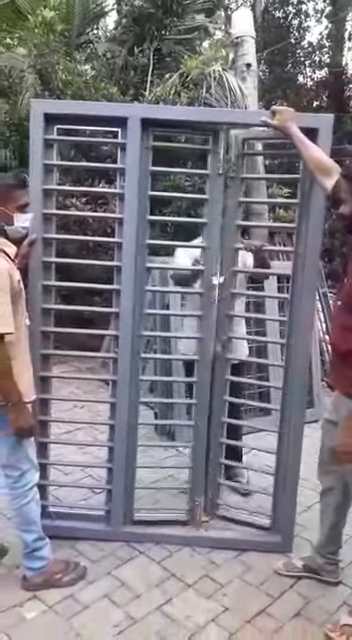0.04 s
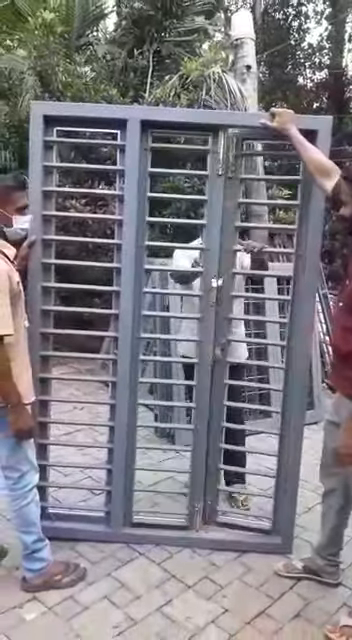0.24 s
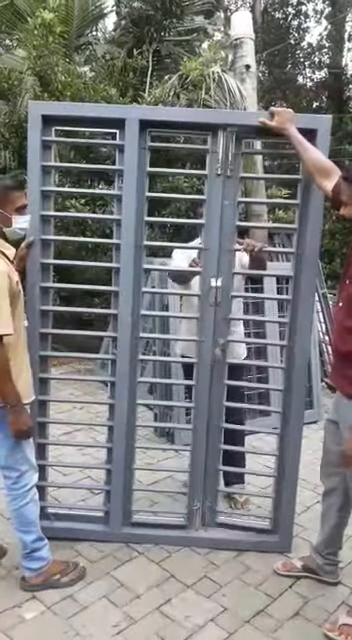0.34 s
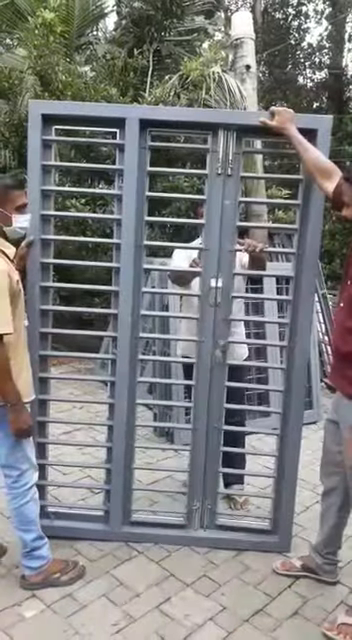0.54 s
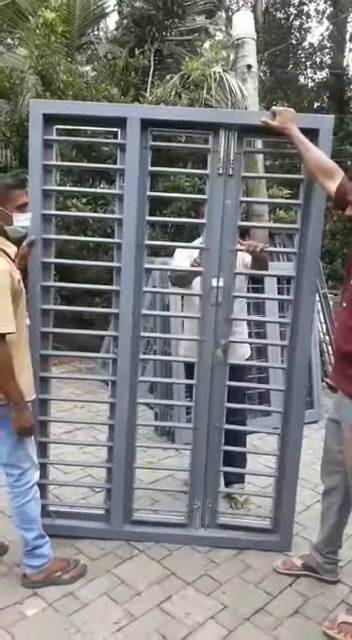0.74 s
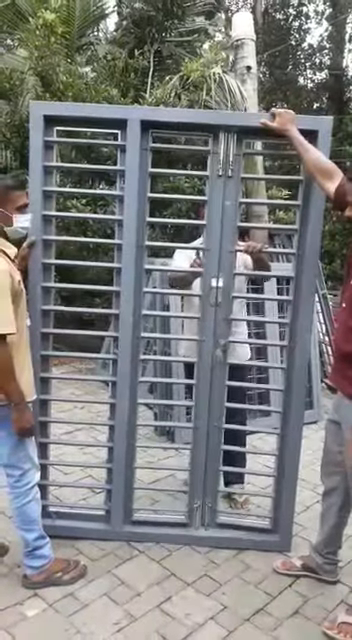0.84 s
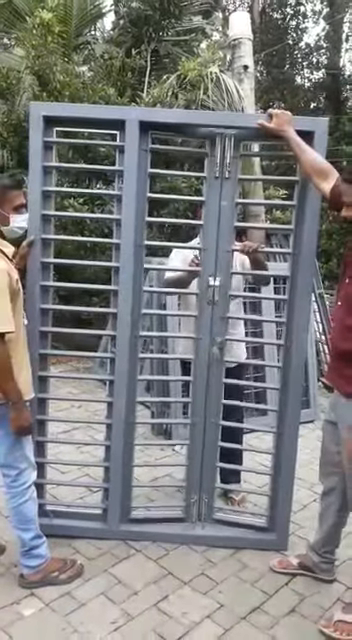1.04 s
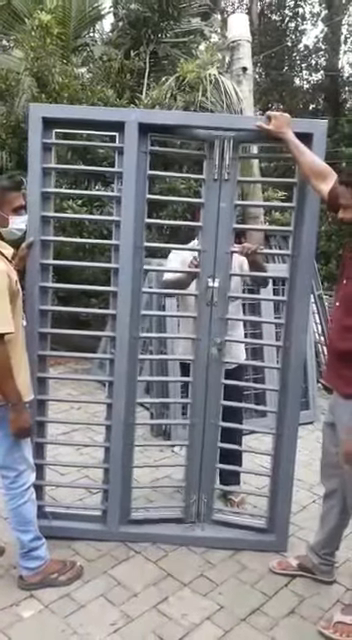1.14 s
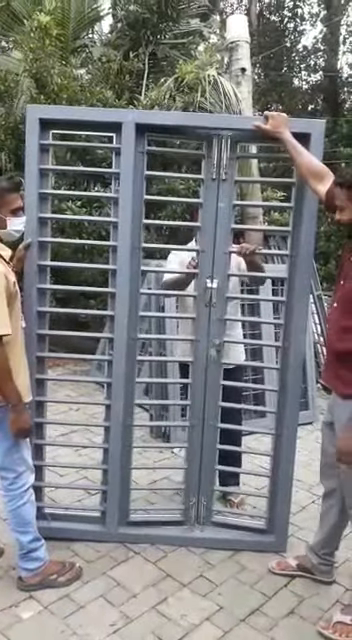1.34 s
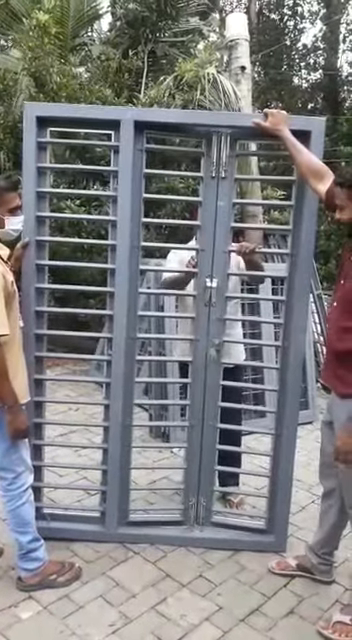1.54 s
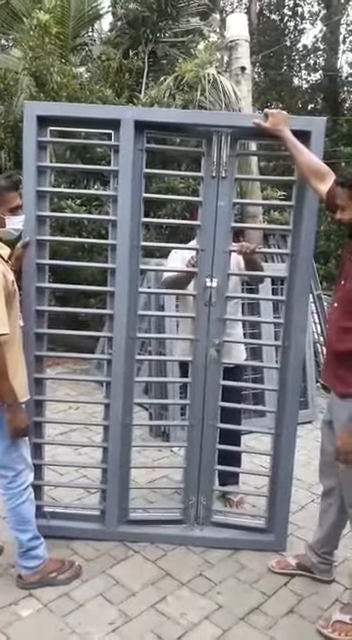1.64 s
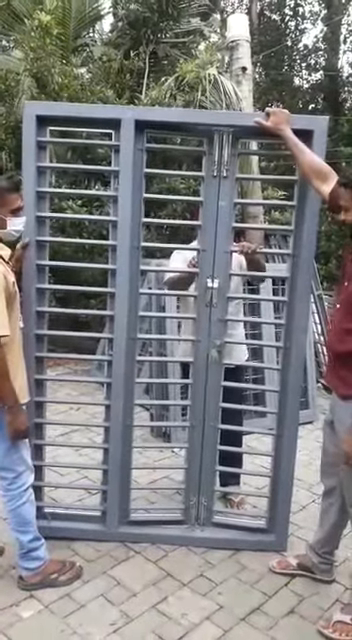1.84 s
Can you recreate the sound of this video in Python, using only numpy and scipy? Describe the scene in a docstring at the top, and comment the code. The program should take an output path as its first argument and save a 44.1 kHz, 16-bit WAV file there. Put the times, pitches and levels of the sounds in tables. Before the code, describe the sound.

Two barred steel shutter leaves slam against their metal frame with two loud clanks in quick succession, then small taps and a lighter late clack, over thin cicada buzz and cricket chirps in an open yard, phone microphone nearby.

```python
"""Two steel shutter leaves swing shut against their barred frame in a paved yard. Each contact excites a dense
decaying ring and clear bar modes; low hums, light taps and bright latch jingles accompany the contacts.
Cicadas are noise gated by uneven clicks and heard through resonances; a cricket is a pulsed, wavering whistle.
One soft rustle of leaves and the yard air are coloured noise."""
import sys
import numpy as np
from scipy import signal
from scipy.fft import rfft, irfft, next_fast_len
from scipy.io import wavfile
from scipy.ndimage import uniform_filter1d, map_coordinates

SR = 44100
rng = np.random.default_rng(int(sys.argv[2]) if len(sys.argv) > 2 else 0)


def store_wav(level_fs):
    """Save 16-bit WAV to argv[1]."""
    pcm = np.round(np.clip(np.atleast_2d(level_fs), -1, 1) * 32767)
    wavfile.write(sys.argv[1], SR, pcm.T.astype(np.int16))


def undo_db(level):
    """Turn decibels back into plain size, where 20 dB means ten times bigger."""
    steps = np.asarray(level, float) / 20
    return 10 ** steps


N = 83790  # length of the scene in samples

# Contacts of leaf on frame: start_s, level_db, treble_lift_db, bass_lift_db, ring_share (factor on decay times)
CONTACTS = [(-.02, -38.5, -0.5, -9.5, 1.1), (0.2367, -14, -5, 3.5, 0.61), (.241, -17, -8, 3, 0.76),
            (.246, -13, -4, 0, 0.92), (0.256, -37, 14.5, -16, 1.5), (.308, -27, 1.5, -5, 1.73),
            (.338, -29.5, 0.5, -4, 0.7), (.362, -30.5, 7, -23, 0.43), (.507, -18, 8, 3.5, 1.18),
            (.5105, -24, 5.5, -5.5, 1.6), (.518, -12.5, -5, 2.5, 0.53), (.533, -15, 0.5, 4, 0.74),
            (0.579, -31.5, 10.5, 10, 2.17), (.616, -27, 6, -33, 0.38), (.648, -25.5, 4, -3, 1.01),
            (.715, -36, 3.5, -17, 1.3), (0.816, -37.5, -1.5, 6, 0.76), (0.859, -44.5, -6.5, 9, 1.04),
            (1.284, -46.5, -4, 11.5, 2.4), (1.372, -39.5, -3, 1, 1.25), (1.568, -39.5, 1.5, 8, 0.63),
            (1.582, -23.5, 3, -12.5, 0.48), (1.59, -29, 0, 5, 0.96), (1.621, -27, 1, -6, 0.76),
            (1.645, -45, 6, 18, 1.18), (1.677, -36.5, -1, -10, 0.9), (1.738, -40.5, 1, -13, 1.87)]
TREBLE_LIFT_HZ, BASS_LIFT_HZ = 3020, 626  # half of each lift in dB is reached here
# Clear modes of the bars: pitch_hz, level_db (before lift and scatter), t60_s (before ring_share)
BAR_MODES = [(609.1, -12, 0.34), (649, -14.5, 0.29), (1009, -12.5, 0.28), (1087, -16, 0.41),
             (1145, -18, 0.42), (1438, -15, 0.28), (1596, -29, 0.98), (1836, -3.5, 0.17), (1890, -15, 0.46),
             (2020, -16, 0.34), (2020, -31, 0.17), (2200, -33, 0.26), (2116, -44, 0.12),
             (2595, -24.5, 0.91), (2860, -16, 0.3), (2930, -26, 0.21), (3690, -44, 0.31)]
MODE_SCATTER_DB, MODE_RISE_S = 3, 0.0012
# Dense ring of bars and sheet, relative spectrum: frequency_hz, density_db (per Hz)
RING_SPECTRUM = [(80, -24), (170, -14), (300, -2.5), (470, -7), (620, -4), (1000, -3.5), (1400, -2.5),
                 (2250, 3), (3200, -4), (4500, -12), (6500, -17.5), (8700, -18.5), (10300, -35),
                 (12500, -29), (15700, -41)]
# Decay of the dense ring: frequency_hz, t60_s (before ring_share)
RING_DECAY = [(200, 0.59), (600, 0.31), (2000, 0.29), (5000, 0.22), (9000, 0.21), (14000, 0.27)]
RING_DB, RISE_S = 2.5, 0.0012
STRIKE_DB, STRIKE_T60_FACTOR = -7.5, 0.13  # short start of the ring, added to the main part
LINGER_DB, LINGER_T60_FACTOR = -20.5, 3.1  # weaker, longer part of the ring
CHATTER_DB, CHATTER_KNOTS_PER_S = 1.2, 140  # fast unevenness of the loose leaves
STEEL_CUT_HZ = 122

# Low hums of the whole frame after a blow: start_s, level_db, t60_s (before the choke)
HUMS = [(0.239, -20.5, 0.49), (.512, -19, 1.1), (.645, -34, 0.37), (1.599, -37.5, 0.88)]
# Modes of the hum: pitch_hz, level_db
HUM_MODES = [(183, -20), (240, -15.5), (279, -3), (309, -1.5), (345, -16)]
HUM_RISE_S, HUM_WAVER_RAD = 0.0058, 0.8
HUM_CHOKE_S = 0.22  # the held frame chokes its hum after about this long

# Light taps of single bars and fittings: start_s, level_db, centre_hz, half_width_octaves, t60_s
TAPS = [(0.729, -25.5, 2530, 0.22, 0.078), (0.815, -28.5, 1890, 0.38, 0.063),
        (.819, -35, 660.5, 0.45, 0.17), (0.984, -33, 2410, 0.37, 0.074), (.987, -51.5, 3700, 0.019, 0.24),
        (1.286, -41.5, 802, 1, 0.25), (1.289, -41, 330, 0.11, 0.54), (1.3, -39.5, 202, 0.15, 0.57),
        (1.373, -36.5, 315, .3, 0.31), (1.528, -40, 650, 0.42, 0.16), (1.534, -45.5, 1040, 0.14, 0.25),
        (1.585, -34.5, 1127, 0.11, 0.19), (1.716, -25.5, 2315, 0.36, 0.12),
        (1.877, -34.5, 2315, 0.34, 0.13)]
# Bright jingles of the latch: start_s, level_db, t60_s
JINGLES = [(0.244, -30, 0.094), (.252, -23, 0.084), (0.269, -41, .3), (.336, -38, .12), (.356, -34.5, 0.14),
           (.364, -43, 0.12), (0.51, -26, .15), (0.529, -32, 0.23), (.58, -50, 0.23), (.648, -48, 0.093),
           (.798, -52, 0.069), (.817, -53, .1), (1.371, -57, .1), (1.57, -52, 0.11), (1.587, -42, .06),
           (1.617, -38, .07), (1.64, -52, .1), (1.674, -47, .1), (1.736, -52, .08)]
# Latch and loose fittings, relative spectrum: frequency_hz, density_db (per Hz)
JINGLE_SPECTRUM = [(5000, -39), (7000, -49), (10500, -5.5), (13000, 4.5), (14500, 3), (15700, -1)]
JINGLE_RISE_S = 0.0015

# Course of the cicada buzz: time_s, level_db
CICADA_COURSE = [(0.0, -36.5), (0.348, -36.5), (0.942, -40.5), (1.238, -40.5), (1.804, -36.5), (1.9, -35.5)]
# Resonances of the cicada buzz: centre_hz, width_hz, level_db, gust_db (its sign sets the direction)
BUZZ_BANDS = [(2276, 190, -7.5, 2), (4495, 400, -20.5, -1.5), (8510, 260, -11, -2), (8988, 474, -3.5, 1.5),
              (13300, 500, -33, -4)]
CLICK_RATE_HZ, CLICK_JITTER, CLICK_FLOOR = 300, 0.66, 1  # mean rate, relative jitter, noise between clicks

# Cricket chirps: centre_s, level_db
CHIRPS = [(.2, -35.5), (.53, -30), (.862, -34.5), (1.2, -38), (1.53, -54), (1.87, -36)]
CHIRP_HZ, CHIRP_HALF_WIDTH_S, CHIRP_PULSE_HZ, CHIRP_PULSE_DEPTH = 8660, 0.026, 265, 0.13

# Leaf rustle, relative spectrum: frequency_hz, density_db (per Hz)
RUSTLE_SPECTRUM = [(1200, -11), (1700, 3.5), (3000, 0), (6000, -9.5), (10000, -17), (13000, -13.5),
                   (15700, -18)]
RUSTLE_PEAK_S, RUSTLE_SIGMA_S, RUSTLE_DB, RUSTLE_FLICKER_DB = 1.203, 0.096, -44.5, 1.0
# Yard air, relative spectrum: frequency_hz, density_db (per Hz)
AIR_SPECTRUM = [(25, -28), (80, -3.5), (250, -3), (550, -12.5), (1100, -18), (2250, -9), (3400, -16.5),
                (4400, -20), (7400, -18), (8900, -17), (10200, -34), (15700, -26)]
AIR_DB, AIR_SWAY_DB = -51.5, 1.2


def unit(x):
    """Normalisation: scale a signal to rms 1."""
    return x / np.sqrt(np.mean(x ** 2) + 1e-20)


def along(points, hz):
    """Interpolation of (frequency, value) points on a logarithmic frequency axis."""
    f, v = np.transpose(points)
    return np.interp(np.log(hz + 1), np.log(f + 1), v)


def wobble(rate):
    """Smooth random modulation, slow or fast: a cubic spline through random knots, rate knots a second."""
    knots = rng.standard_normal(int(N * rate / SR) + 4)
    return map_coordinates(knots, [np.arange(N) * rate / SR])


def filtered(x, response):
    """Linear filtering: multiply the spectrum by a response of frequency."""
    m = next_fast_len(N + SR // 2)
    return irfft(rfft(x, m) * response(np.fft.rfftfreq(m, 1 / SR)), m)[:N]


def hiss(spectrum, patchy_db):
    """Random texture: coloured noise of rms 1 with time-frequency patches of random gain."""
    z = signal.stft(rng.standard_normal(N), nperseg=512)[2]
    field = uniform_filter1d(rng.standard_normal(z.shape), 6, 0)
    field = uniform_filter1d(field, 10, 1)
    patchy = signal.istft(z * undo_db(patchy_db * unit(field)), nperseg=512)[1][:N]
    return unit(filtered(patchy, lambda hz: undo_db(along(spectrum, hz))))


def shutters():
    """Superposition of all contacts, hums, taps and jingles; the frame radiates no deep bass."""
    sounds = [(s, undo_db(db) * clang(*how)) for s, db, *how in CONTACTS]
    sounds += [(s, undo_db(db) * hum(t60)) for s, db, t60 in HUMS]
    sounds += [(s, undo_db(db) * tap(*how)) for s, db, *how in TAPS]
    sounds += [(s, undo_db(db) * jingle(t60)) for s, db, t60 in JINGLES]
    out = np.zeros(N + 2 * SR)  # one second of margin at each end
    for s, one in sounds:
        out[round((s + 1) * SR):][:len(one)] += one

    def radiation(hz):
        ratio = 1j * hz / STEEL_CUT_HZ
        return (ratio / (1 + ratio)) ** 3
    return filtered(out[SR:SR + N], radiation)


def clang(treble_db, bass_db, share):
    """Impact excitation: a dense ring dying band by band, plus the clear modes of the bars."""
    t = np.arange(SR * 3 // 4) / SR

    def lift_db(hz):
        bass = bass_db / (1 + (hz / BASS_LIFT_HZ) ** 4)
        return bass + treble_db / (1 + (TREBLE_LIFT_HZ / (hz + 1)) ** 4)

    hz, s, z = signal.stft(rng.standard_normal(len(t)), SR, nperseg=512, noverlap=384)
    t60 = share * along(RING_DECAY, hz)[:, None]
    fade = undo_db(-60 * s / t60)
    fade = fade + undo_db(STRIKE_DB - 60 * s / (t60 * STRIKE_T60_FACTOR))
    fade = fade + undo_db(LINGER_DB - 60 * s / (t60 * LINGER_T60_FACTOR))
    colour = undo_db(along(RING_SPECTRUM, hz))
    gain = colour * undo_db(lift_db(hz)) / np.sqrt(np.mean(colour ** 2))
    z *= gain[:, None] * fade
    dense = signal.istft(z, SR, nperseg=512, noverlap=384)[1][:len(t)]
    dense = dense * (1 - np.exp(-t / RISE_S))
    chatter = undo_db(RING_DB + CHATTER_DB * wobble(CHATTER_KNOTS_PER_S)[:len(t)])

    f, db, ring_s = np.transpose(BAR_MODES)[:, :, None]
    scatter, turns = rng.standard_normal((2, len(f), 1))  # random level and phase of each mode
    mode_level = undo_db(db + lift_db(f) + MODE_SCATTER_DB * scatter - 60 * t / (ring_s * share))
    clear = (mode_level * np.sin(2 * np.pi * (f * t + turns))).sum(0)
    return chatter * dense + clear * (1 - np.exp(-t / MODE_RISE_S))


def hum(t60):
    """Modal superposition: low modes of the frame beat, waver a little and are choked."""
    t = np.arange(SR) / SR
    ring = np.zeros(SR)
    for hz, db in HUM_MODES:
        waver = HUM_WAVER_RAD * wobble(14.2)[:SR]
        ring += undo_db(db) * np.sin(2 * np.pi * hz * t + waver)
    choke = 1 / (1 + (t / HUM_CHOKE_S) ** 6)
    return ring * undo_db(-60 * t / t60) * choke * (1 - np.exp(-t / HUM_RISE_S))


def tap(centre_hz, octaves, t60):
    """Resonance of a lightly struck bar or fitting: a noise burst in one band."""
    return burst(lambda f: 1 / (1 + (np.log2(f / centre_hz) / octaves) ** 4), t60, RISE_S)


def jingle(t60):
    """Vibration of the latch and loose fittings: a bright noise burst."""
    return burst(lambda f: undo_db(along(JINGLE_SPECTRUM, f)), t60, JINGLE_RISE_S)


def burst(colour, t60, rise_s):
    """Exponential decay: coloured noise, rms 1 before its envelope, rises fast and dies away."""
    t = np.arange(SR // 2) / SR
    hz = np.fft.rfftfreq(len(t), 1 / SR) + 1
    noise = irfft(rfft(rng.standard_normal(len(t))) * colour(hz), len(t))
    chatter_db = CHATTER_DB * wobble(CHATTER_KNOTS_PER_S)[:len(t)]
    return unit(noise) * undo_db(chatter_db - 60 * t / t60) * (1 - np.exp(-t / rise_s))


def cicadas():
    """Resonant filtering of uneven tymbal clicks, blurred by the chorus."""
    level_db = np.interp(np.arange(N) / SR, *np.transpose(CICADA_COURSE))
    out = np.zeros(N)
    for hz, width_hz, db, gust_db in BUZZ_BANDS:
        phase = np.cumsum(CLICK_RATE_HZ * (1 + CLICK_JITTER * wobble(65))) / SR
        gate = CLICK_FLOOR + (0.5 + 0.5 * np.cos(2 * np.pi * phase)) ** 4
        band = filtered(gate * rng.standard_normal(N),
                        lambda f: 1 / (1 + (2 * (f - hz) / width_hz) ** 4) ** 0.5)
        gust = np.tanh(wobble(11.3) + 0.35 * wobble(40.86))
        out += undo_db(db + gust_db * gust) * unit(band)
    return undo_db(level_db) * out


def cricket():
    """Amplitude modulation: short pulsing whistles, three a second, with a wavering phase."""
    t = np.arange(N) / SR
    shape = sum(undo_db(db) * np.exp(-((t - s) / CHIRP_HALF_WIDTH_S) ** 4) for s, db in CHIRPS)
    shape *= 1 + CHIRP_PULSE_DEPTH * np.cos(2 * np.pi * CHIRP_PULSE_HZ * t)
    return shape * np.sin(2 * np.pi * CHIRP_HZ * t + 0.61 * wobble(27.4))


def rustle():
    """Broadband noise of leaves under one Gaussian swell with a slight flicker."""
    t = np.arange(N) / SR
    swell = np.exp(-0.5 * ((t - RUSTLE_PEAK_S) / RUSTLE_SIGMA_S) ** 2)
    level = undo_db(RUSTLE_DB + RUSTLE_FLICKER_DB * wobble(29.96))
    return level * swell * hiss(RUSTLE_SPECTRUM, patchy_db=2.2)


def yard_air():
    """Ambient noise: outdoor air as coloured noise whose level sways gently."""
    return undo_db(AIR_DB + AIR_SWAY_DB * wobble(3.8)) * hiss(AIR_SPECTRUM, patchy_db=-2.5)


def scene():
    """Superposition of shutters, insects, leaves and yard air in one channel."""
    return (shutters() + cicadas() + cricket() + rustle() + yard_air())[None]


def top_cut(x):
    """Nothing passes above the cut-off."""
    return signal.sosfilt(signal.butter(12, 15860, fs=SR, output="sos"), x)


def record(dry):
    """Band limitation and saturation in a phone: bass cut, then soft clipping."""
    low_cut_hz, clip_top = 25, 0.98

    def bass_cut(hz):
        ratio = 1j * hz / low_cut_hz
        return (ratio / (1 + ratio)) ** 2
    x = filtered(dry[0], bass_cut)
    x = x / (1 + np.abs(x / clip_top) ** 6) ** (1 / 6)
    return top_cut(x[None])


dry = scene()
out = record(dry)
store_wav(out)
```